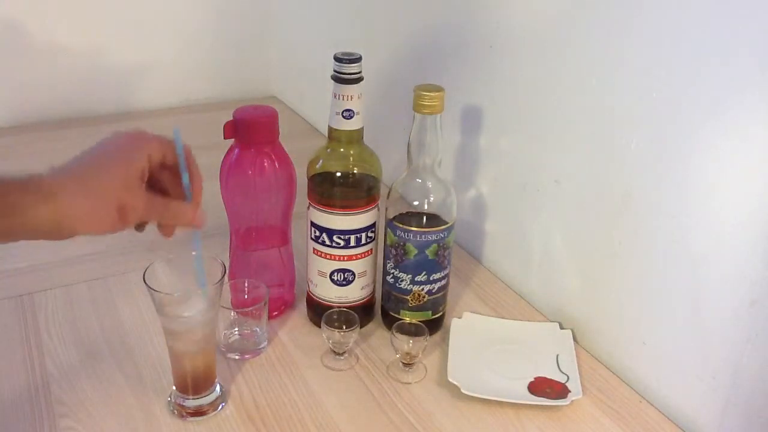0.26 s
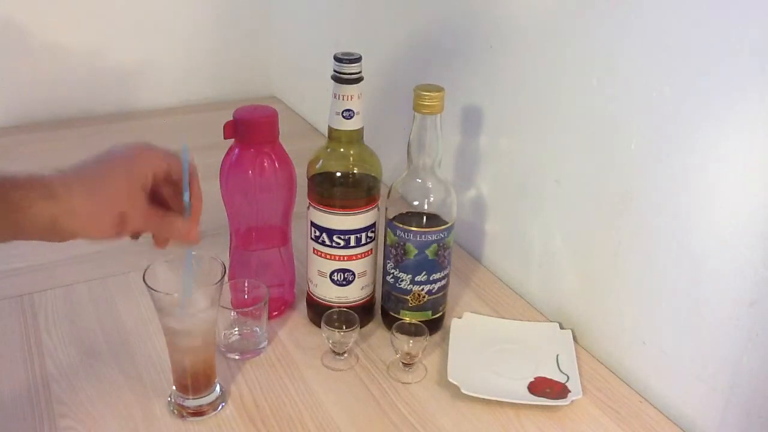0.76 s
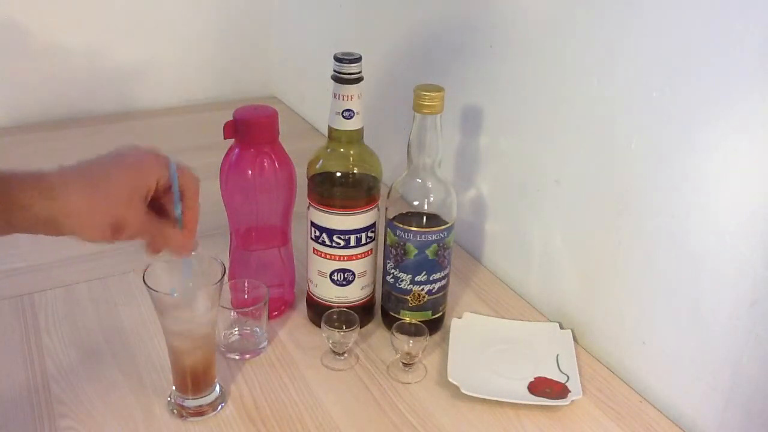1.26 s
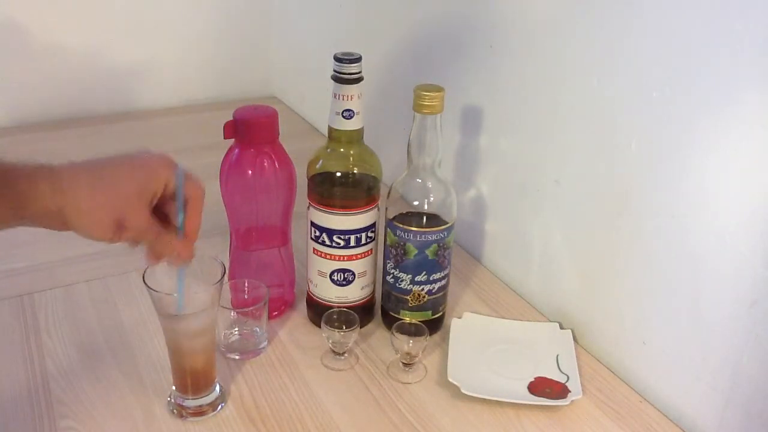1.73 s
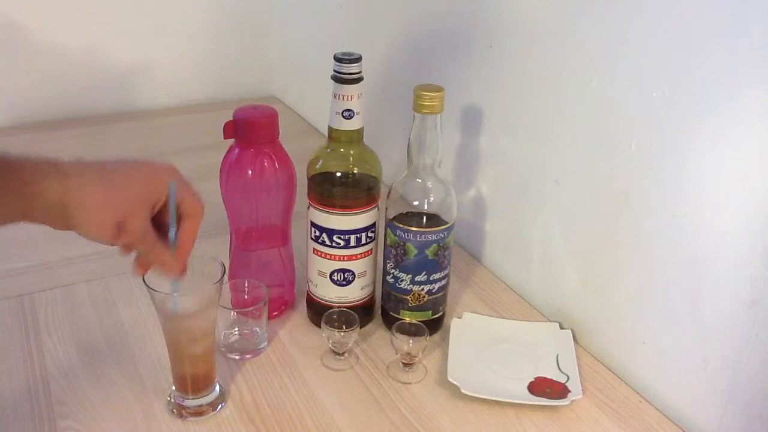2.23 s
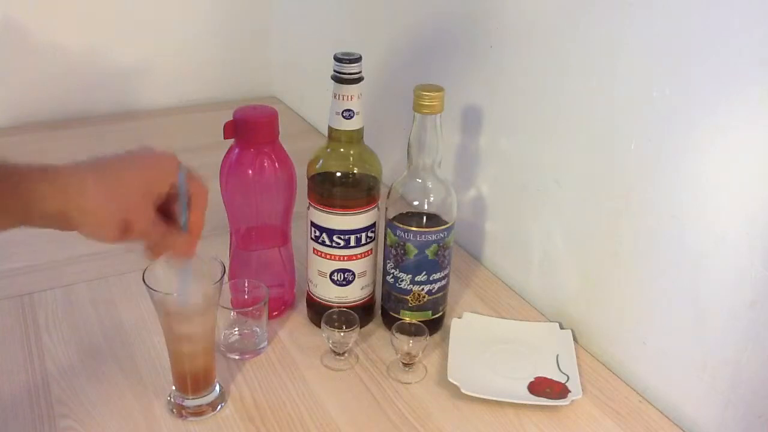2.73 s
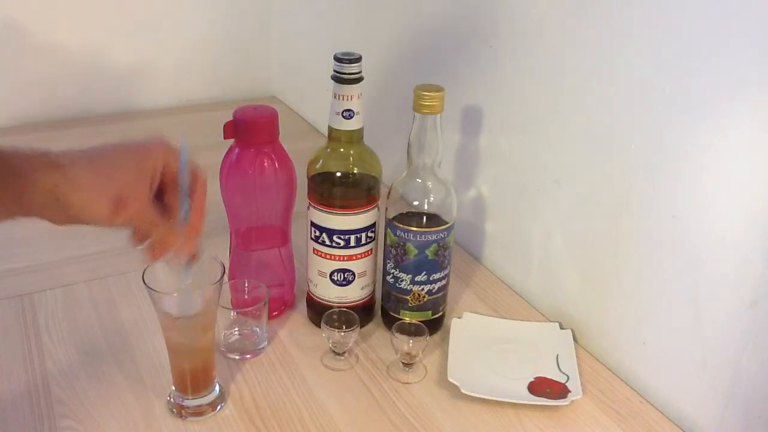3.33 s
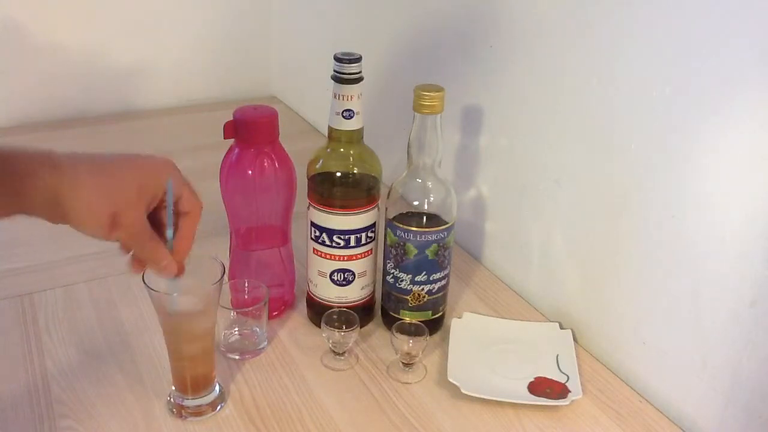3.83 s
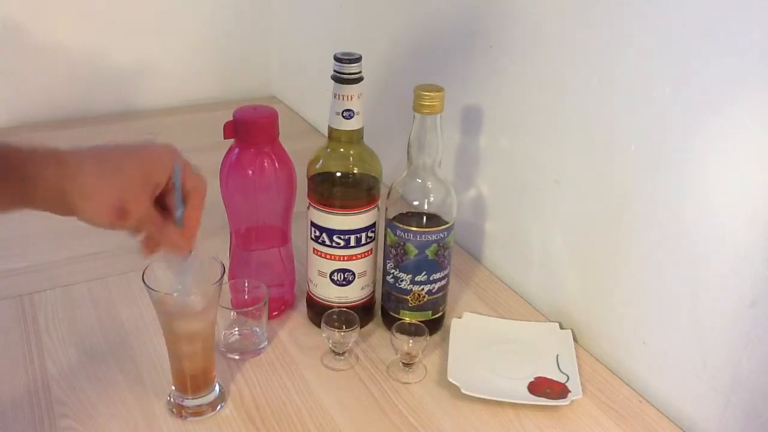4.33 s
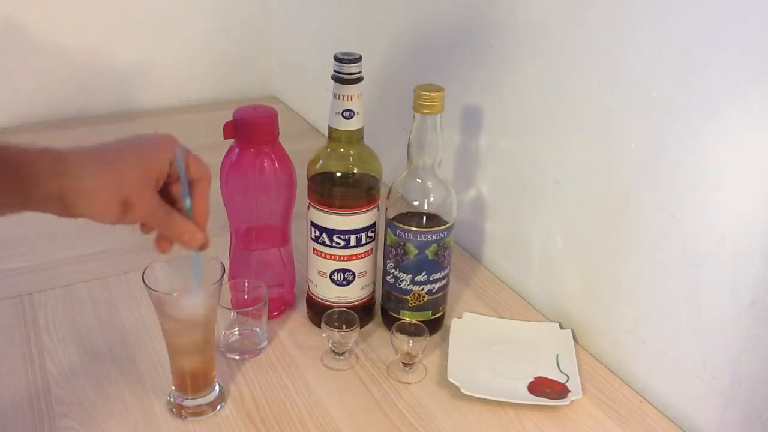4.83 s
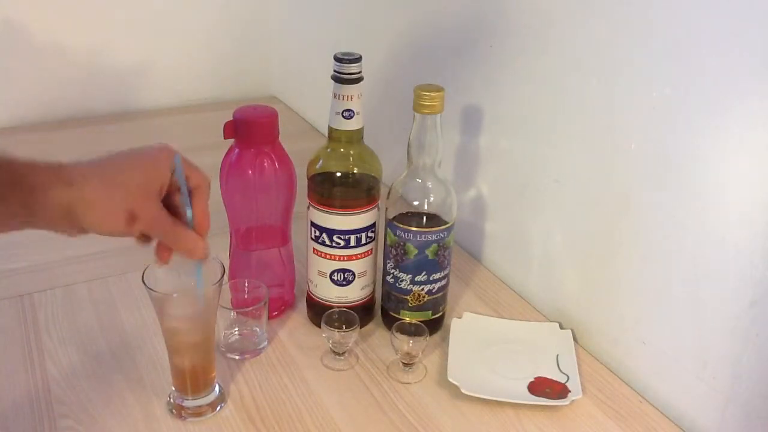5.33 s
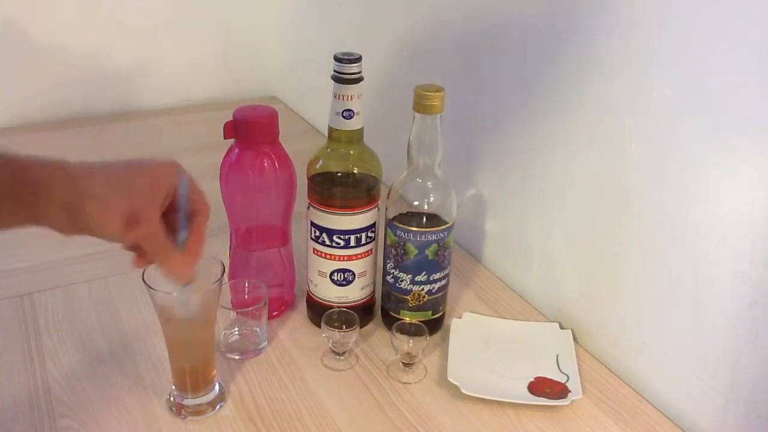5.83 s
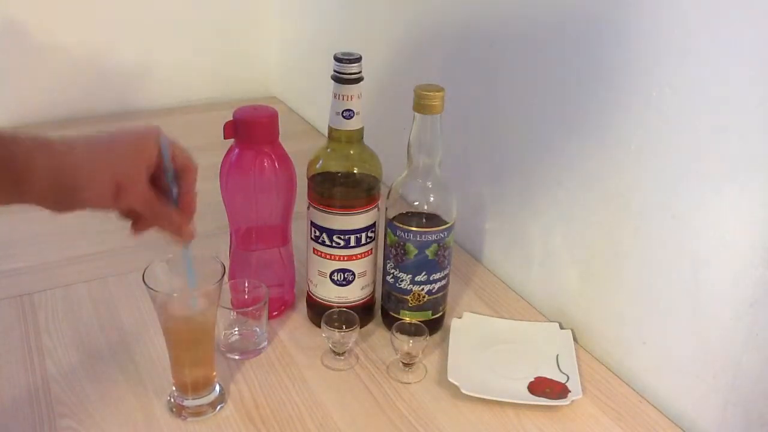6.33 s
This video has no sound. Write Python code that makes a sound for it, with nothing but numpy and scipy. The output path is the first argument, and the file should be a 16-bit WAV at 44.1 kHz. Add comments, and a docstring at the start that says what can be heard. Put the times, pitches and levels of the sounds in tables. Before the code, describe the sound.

A straw stirs an iced drink, the cubes knocking, scraping and briefly ringing the glass over soft liquid churning.

```python
"""Ice cubes, stirred with a straw, knock round a tall glass on a wooden table in a small bare room.
Each knock rings the glass wall, whose pitch shifts as the drink sloshes. Between knocks the cubes
chatter, grind and ping against each other. The straw churns the drink, traps air that rings as
bubbles and now and then jolts the glass on the table. Faint room noise and mains hum lie beneath."""
import sys
import numpy as np
from scipy import signal
from scipy.fft import rfft, irfft, next_fast_len
from scipy.io import wavfile

SR = 44100
rng = np.random.default_rng(int(sys.argv[2]) if len(sys.argv) > 2 else 0)


def master_out(mix):
    """Clip the mix to full scale and print it as 16-bit PCM to the path in sys.argv[1]."""
    frames = np.transpose(np.atleast_2d(mix))
    ceiling = np.clip(frames, -1, 1)
    pcm = np.round(ceiling * 32767).astype(np.int16)
    wavfile.write(sys.argv[1], SR, pcm)


N = 289296
AGE_S = np.arange(SR * 2 // 5) / SR  # time since a contact

# Clear knocks of ice on glass. Each row: start in seconds, nominal swell and hold in seconds,
# then low mode, second mode, upper mode and ice levels in dB, before each part's offset.
ICE_KNOCKS = [(0.001, 0.00057, .021, -30.5, -35, -47, -51), (0.051, .0006, 0.031, -39.5, -42, -63, -57),
              (0.075, 0.0008, 0.011, -37.5, -30, -39.5, -48.5), (0.118, .0005, 0.01, -49, -43, -63, -56),
              (0.259, .0004, 0.0097, -58, -44, -61, -67), (0.2816, 0.00065, 0.014, -35, -46, -48.5, -52),
              (0.3343, .0006, 0.014, -38.5, -42, -65, -70), (0.527, 0.0022, 0.0092, -38, -35, -48, -48),
              (0.5966, 0.0038, 0.0097, -40, -37, -57, -58), (0.6155, .0005, 0.0039, -32, -37, -59, -60),
              (0.6487, .0005, 0.022, -41, -40, -55, -52), (0.67, .0006, 0.0085, -36.5, -31.5, -39, -46),
              (0.7475, 0.00049, 0.0072, -45, -28.5, -42, -48.5),
              (0.784, .0004, 0.011, -35.5, -35, -55, -54), (0.8735, .0003, 0.0084, -26.5, -26.5, -33, -40),
              (1.007, 0.00035, 0.011, -30.5, -43, -63, -44.5),
              (1.068, 0.0027, 0.0094, -58, -34.5, -69, -63), (1.115, .0004, .009, -48, -41.5, -52, -64),
              (1.164, .0008, 0.011, -41.5, -57, -69, -61), (1.288, .0005, 0.031, -38, -42, -63, -52),
              (1.396, .0005, 0.014, -36, -41, -68, -63), (1.4372, .002, .012, -51, -44, -69, -69),
              (1.5273, 0.00088, 0.014, -40.5, -37, -49, -53), (1.57, 0.00036, .008, -46, -37.5, -65, -57),
              (1.643, .0005, .01, -53, -36.5, -55, -62), (1.7764, .0004, 0.03, -39, -38, -69, -44),
              (1.8302, 0.00056, 0.0077, -32.5, -38, -40, -44), (2.02, .001, 0.011, -44, -33.5, -49, -50),
              (2.039, 0.0027, 0.011, -30.5, -28.5, -37, -42.5),
              (2.073, 0.016, 0.0035, -25.5, -29, -57, -54), (2.101, 0.00097, 0.0075, -19, -17, -30, -41),
              (2.264, 0.00045, 0.017, -37, -31.5, -51, -46),
              (2.2874, 0.00055, 0.019, -35, -32.5, -63, -45.5), (2.4136, 0.0041, 0.01, -38, -47, -64, -60),
              (2.513, 0.00045, .02, -39.5, -41, -48, -47.5), (2.574, .0005, 0.0074, -29, -37.5, -57, -51),
              (2.6311, .0004, 0.016, -47, -38, -63, -56), (2.7575, 0.0004, 0.014, -42, -27.5, -45, -43),
              (2.823, .0013, 0.0049, -39, -28, -46, -57), (2.8323, 0.0053, 0.0056, -29, -21.5, -30.5, -42),
              (2.864, .0006, 0.0067, -31, -45, -54, -61), (2.93, 0.00058, 0.0075, -49, -30, -34.5, -42.5),
              (3.04, 0.00077, 0.008, -37, -29.5, -58, -51), (3.1599, .0012, 0.011, -35.5, -39, -65, -63),
              (3.1932, .008, 0.0081, -26, -25.5, -43, -38),
              (3.2276, 0.0044, 0.013, -17.5, -17.5, -26, -37.5),
              (3.277, 0.00076, 0.0055, -39, -22.5, -46, -59), (3.301, 0.0012, 0.0083, -38, -23.5, -43, -47),
              (3.3446, .0005, 0.011, -39, -43, -43, -43), (3.4476, 0.004, 0.022, -35, -25, -43.5, -43.5),
              (3.667, 0.015, .02, -33, -25.5, -44.5, -41), (3.766, 0.00038, 0.016, -43, -27, -50, -59),
              (3.8154, 0.0044, .02, -38, -31, -43.5, -43), (3.91, 0.00054, 0.032, -35.5, -34.5, -60, -48.5),
              (3.9896, 0.00061, 0.016, -37, -26, -43, -48), (4.107, 0.0012, 0.027, -54, -42, -51, -40.5),
              (4.136, 0.012, 0.011, -28, -24.5, -55, -42), (4.2324, 0.00063, 0.035, -46, -37.5, -56, -48.5),
              (4.3605, .0005, 0.01, -36.5, -25.5, -40, -43), (4.412, .0005, 0.0098, -36.5, -34, -58, -68),
              (4.4527, 0.00037, .014, -46, -27, -39.5, -49), (4.564, .022, 0.012, -37.5, -33.5, -45, -44),
              (4.613, .0003, 0.01, -29.5, -20.5, -28.5, -38), (4.689, 0.009, 0.044, -47, -49, -50, -47),
              (4.826, 0.00028, 0.0073, -30, -17.5, -28, -36.5),
              (4.8856, 0.00022, 0.014, -31, -18.5, -29, -38.5),
              (4.953, 0.0081, 0.012, -43, -32.5, -44, -44.5), (5.014, .004, 0.01, -33, -34.5, -50, -45),
              (5.034, .016, 0.04, -36.5, -61, -64, -67), (5.314, 0.00034, 0.015, -38.5, -40, -70, -73),
              (5.467, 0.00071, 0.013, -33.5, -31.5, -33, -40), (5.524, 0.0023, .016, -38, -38.5, -57, -50),
              (5.602, .0005, 0.0065, -35, -31.5, -55, -57), (5.6897, 0.018, 0.07, -55, -50, -59, -40.5),
              (5.745, 0.0063, 0.0091, -57, -25.5, -39, -45),
              (5.816, 0.00032, 0.0047, -33.5, -36, -41, -51.5),
              (5.9202, .0008, 0.015, -34, -33.5, -53, -47.5), (5.931, 0.00072, 0.0059, -26, -46, -46, -40),
              (5.975, 0.0038, 0.017, -39, -21.5, -38, -44), (6.038, 0.0057, 0.0087, -32, -25, -51, -40),
              (6.056, 0.0024, 0.021, -33, -22.5, -33.5, -36),
              (6.077, 0.00035, 0.0042, -27, -18, -38, -35.5),
              (6.3271, 0.00042, 0.0069, -35.5, -36.5, -70, -60), (6.471, 0.0017, 0.024, -41, -66, -75, -73)]
# Wall pitch as the drink leans. Each row: time in seconds, low mode in Hz.
WALL_DRIFT = [(0.0, 2464), (0.05, 2422), (0.84, 2420), (0.88, 2525), (1.02, 2410), (1.77, 2418),
              (1.81, 2530), (2.21, 2408), (3.12, 2360), (3.25, 2472), (3.4, 2424), (4.07, 2367),
              (4.11, 2485), (4.22, 2384), (6.03, 2435), (6.06, 2550), (6.38, 2428), (6.56, 2437)]
# Upper wall modes under a knock. Each row: frequency in Hz, relative level in dB.
UPPER_MODES = [(6700, -3.5), (9840, -19.5), (13700, -24)]
# Wall modes under light chatter. Each row: frequency in Hz, t60 in seconds, relative level in dB.
CHATTER_MODES = [(2421.5, 0.045, 7.5), (4313, 0.079, 3.5), (5390, 0.047, -9.5), (6770, 0.035, -8)]
# Straw sweeps. Each row: peak time in seconds, half length in seconds, push in dB,
# grinding in dB relative to the push.
SWEEPS = [(0.039, 0.14, -45, -7.5), (0.309, 0.055, -48, -7.5), (0.624, 0.049, -46, -2),
          (0.775, 0.07, -41, -6), (0.996, 0.051, -43.5, -2.5), (1.316, 0.058, -44.5, -10),
          (1.584, 0.086, -49.5, -5), (1.811, 0.052, -41.5, -11), (2.045, 0.1, -41.5, -8.5),
          (2.273, 0.066, -40.5, -8), (2.541, 0.055, -45.5, -2), (2.747, 0.054, -42, -6),
          (2.959, 0.047, -41.5, -3.5), (3.228, 0.044, -37, -4), (3.428, .07, -37, -10),
          (3.709, 0.06, -38.5, -8), (3.903, .04, -44.5, -3), (4.153, 0.053, -40.5, -6.5),
          (4.378, 0.074, -42.5, -2.5), (4.651, .04, -44.5, -8), (4.874, 0.071, -37.5, -9),
          (4.997, 0.064, -45, -10), (5.284, .05, -51, -16), (5.549, .06, -40.5, -11),
          (5.728, 0.045, -38.5, -5), (5.989, 0.042, -30.5, -4.5), (6.098, 0.063, -34, -5.5),
          (6.327, .07, -49, -8), (6.531, .06, -46.5, -16)]
# Air pulled under by the straw. Each row: start in seconds, relative level in dB, pitch in Hz.
GULPS = [(0.077, -39.5, 1460), (1.5755, -41, 1650), (1.655, -43, 1800), (3.6184, -34.5, 1730),
         (3.6446, -28, 1720), (3.9015, -42, 1590), (4.135, -36.5, 1616), (4.8386, -33.5, 1400),
         (4.8471, -24.5, 1660), (5.04, -40, 1930), (5.672, -43, 1960), (5.9763, -31.5, 1610),
         (6.0166, -28, 1640), (6.0395, -23, 1566), (6.0785, -22, 1785), (6.131, -19.5, 1723),
         (6.2398, -30, 1710), (6.3, -40, 1790)]
# Cube against cube. Each row: start in seconds, relative level in dB.
CUBE_HITS = [(0.5063, -39), (0.6723, -27.5), (0.769, -32), (0.851, -34), (0.909, -24.5), (0.96, -36),
             (2.032, -29), (2.08, -35), (2.2647, -38), (2.448, -33), (3.2044, -22.5), (3.4357, -31),
             (3.588, -30.5), (3.603, -30.5), (3.656, -32), (4.108, -25), (4.141, -32), (4.798, -31.5),
             (5.465, -30.5), (5.6922, -29), (6.009, -24), (6.104, -27.5)]
# Jolts of the glass on the table. Each row: start in seconds, relative level in dB.
JOLTS = [(0.612, -27), (0.67, -42), (2.775, -30.5), (2.929, -26.5), (3.231, -28.5), (3.435, -33.5),
         (4.145, -25.5), (5.725, -30), (5.755, -26.5), (6.077, -28)]
# Mains hum. Each row: frequency in Hz, rms level in dB.
MAINS_HUM = [(48.4, -84)]
# Room decay. Each row: frequency in Hz, t60 in seconds.
ROOM_T60 = [(200, 0.4), (2000, 0.3), (5000, 0.43), (10000, 0.31), (16000, 0.14)]
# Noise spectra. Each row: frequency in Hz, relative density in dB.
CRACK_SPECTRUM = [(150, -82), (400, -3), (1000, -20), (1700, -6.5), (3000, -1.5), (3700, -0.5), (4900, -1),
                  (5550, -2.5), (6300, -2), (8000, -8), (12000, -15), (15500, -23.5)]  # ice chipping
GRIND_SPECTRUM = [(300, -22.5), (900, 0), (1600, -5.5), (3000, 5), (3700, 4.5), (4900, 2.5), (5550, 12.5),
                  (6300, -13), (8000, -5.5), (12000, -7), (15500, -25)]  # ice rubbing
CHURN_SPECTRUM = [(75, -46.5), (125, -8), (250, -7), (350, 1.5), (400, -4), (500, -4), (600, -11),
                  (850, -15), (1150, -18), (2000, -39)]  # drink gurgling
FLOOR_SPECTRUM = [(18, -56), (30, -37), (77, -21), (105, -16), (135, -4), (240, -3.5), (370, -1.5),
                  (520, -5), (852, -8.5), (2070, -20.5), (2420, -3), (2830, -11), (3880, -20), (4310, -32),
                  (4660, -31), (5450, -16), (6210, -24), (6720, -18), (15500, -21)]  # room noise
SPLASH_SPECTRUM = [(250, -19), (650, -8), (1000, -2.5), (1500, -2.5), (2100, 7), (3000, -3), (8000, -42)]  # drink closing over a gulp
THUD_SPECTRUM = [(70, -58), (150, -48), (270, -5), (345, -3), (400, 7), (470, -2), (530, -4), (620, -8.5),
                 (900, -12), (1300, -29), (2500, -51)]  # glass foot on the table top


def amp(db):
    """Decibels to gain."""
    return 10 ** (np.asarray(db) / 20)


def unit(x):
    """Scale to rms 1."""
    return x / np.sqrt(np.mean(x ** 2) + 1e-20)


def along(points, hz):
    """Interpolate (Hz, value) points on a log axis."""
    points_hz, values = np.transpose(points)
    return np.interp(np.log(hz + 1), np.log(points_hz), values)


def add(track, start_s, sound):
    """Mix a sound into a track."""
    part = track[max(round(start_s * SR), 0):][:len(sound)]
    part += sound[:len(part)]


def coloured(x, spectrum):
    """Minimum-phase filter: clicks keep their sharp start."""
    size = next_fast_len(len(x) + 2048, True)
    gain = amp(along(spectrum, np.fft.rfftfreq(size, 1 / SR)))
    cepstrum = irfft(np.log(gain), size)
    cepstrum[1:size // 2] *= 2
    cepstrum[size // 2 + 1:] = 0
    return irfft(rfft(x, size) * np.exp(rfft(cepstrum)), size)[:len(x)]


def contacts(per_s, spread_db):
    """Random impulses of uneven size; rms 1."""
    hit = rng.random(N) < per_s / SR
    return unit(hit * rng.choice([-1, 1], N) * amp(spread_db * rng.uniform(-2.03, 2.0, N)))


def room_tails(count):
    """Diffuse room responses of energy 1; the top treble dies first."""
    hz, time_s, noise = signal.stft(rng.standard_normal((count, len(AGE_S))), SR, nperseg=256)
    decay = amp(-60 * time_s / along(ROOM_T60, hz)[:, None])
    tails = signal.istft(noise * decay, SR, nperseg=256)[1][:, :len(AGE_S)]
    onset = np.clip((AGE_S - 0.003) / 0.0053, 0, 1)
    corner_boost = 1 + 3.6 * np.exp(-AGE_S / 0.015)  # the corner answers early
    tails = tails * onset * corner_boost
    return tails / np.linalg.norm(tails, axis=1, keepdims=True)


def in_room(x, tails, wet_db):
    """A sound plus one room response, wet_db relative to its rms."""
    wet = signal.fftconvolve(x, tails[rng.integers(len(tails))])[:len(x)]
    return x + amp(wet_db) * np.sqrt(np.mean(x ** 2)) * unit(wet)


def choked_mode(hz, swell_s, hold_s):
    """A wall mode builds during contact; the settling cube chokes it, 6 dB down after hold_s."""
    rise = np.minimum(AGE_S / max(swell_s, 1e-4), 1)
    fall_db = -6 * (np.maximum(AGE_S - swell_s, 0) / hold_s) ** 2.54
    return rise * amp(np.maximum(fall_db, -200)) * np.sin(2 * np.pi * hz * AGE_S)


def free_mode(hz, t60_s, swell_s):
    """A mode builds during contact, then decays freely."""
    rise = np.minimum(AGE_S / max(swell_s, 1e-4), 1)
    fall_db = -60 * np.maximum(AGE_S - swell_s, 0) / t60_s
    return rise * amp(fall_db) * np.sin(2 * np.pi * hz * AGE_S)


def cube_ping():
    """An uneven lump of ice rings in four close, short-lived modes; rms 1."""
    return unit(sum(free_mode(rng.normal(5600, 174), t60_s=0.075, swell_s=0.00074) * rng.choice([-1, 1])
                    for _ in range(4)))


def crack(swell_s, hold_s):
    """A cube chips, then skids, longer with a longer hold: a clump of micro-ticks; rms 1."""
    age_s = AGE_S[:len(AGE_S) // 4]
    rise = np.minimum(age_s / (0.1 * swell_s + 0.00044), 1)
    chip_t60_s, skid_t60_s = 0.0094, 0.023 + 2.5 * hold_s
    fall = amp(-60 * age_s / chip_t60_s) + 0.83 * amp(-60 * age_s / skid_t60_s)
    tick_db = 4.4 * np.repeat(rng.uniform(-0.7, 1, len(age_s)), SR // 1000)[:len(age_s)]  # 1 ms steps
    spectrum = [(hz, db + rng.normal(0, 2.94)) for hz, db in CRACK_SPECTRUM]
    ticks = amp(tick_db) * rng.standard_normal(len(age_s)) * rise * fall
    return unit(np.pad(coloured(ticks, spectrum), (0, len(AGE_S) - len(age_s))))


def light_knocks(per_sweep, swell_s=0.00072, hold_s=0.0083, spread_db=3, edge_fade_db=8.5):
    """Knocks scattered through each sweep, weaker at its edges; rows as in ICE_KNOCKS."""
    rows = []
    balance_db = np.array([-1, 2, -11.5, -12.5])  # low, second, upper, ice
    for peak_s, half_s, push_db, _ in SWEEPS:
        for k in range(per_sweep):
            position = 2 * (k + rng.random()) / per_sweep - 1  # -1 to 1
            levels_db = push_db + balance_db + rng.normal(0, spread_db, 4) - edge_fade_db * position ** 2
            rows.append((peak_s + 1.3 * half_s * position, swell_s, hold_s, *levels_db))
    return rows


def clinks(tails, slosh_scatter_hz=7.4):
    """Ice strikes glass: the wall modes ring, the cube pings and cracks."""
    out = np.zeros(N)
    drift_s, drift_hz = np.transpose(WALL_DRIFT)
    knocks = ICE_KNOCKS + light_knocks(per_sweep=3)
    for start_s, swell_s, hold_s, low_db, second_db, upper_db, ice_db in knocks:
        low_hz = np.interp(start_s, drift_s, drift_hz) + rng.normal(0, slosh_scatter_hz)
        second_hz = 4255 + 0.31 * (low_hz - drift_hz.mean()) + rng.normal(0, slosh_scatter_hz)
        low = amp(low_db) * choked_mode(low_hz, swell_s + 0.0011, hold_s * 0.88)
        second = amp(second_db + 1) * choked_mode(second_hz, swell_s + 0.0006, hold_s * 0.98)
        upper = sum(amp(upper_db + rng.normal(db, 2.2)) * choked_mode(rng.normal(hz, 42), swell_s, hold_s)
                    for hz, db in UPPER_MODES)
        ice = amp(ice_db - 27 + rng.normal(0, 2.7)) * cube_ping()
        ice += amp(ice_db - 12.5) * crack(swell_s, hold_s)
        for part, wet_db in (low, -4.5), (second, -9), (upper, 1.5), (ice, -0.5):
            add(out, start_s, in_room(part, tails, wet_db))
    return out


def sweep_gain(grind=False):
    """Envelope of the straw's push, or of the grinding: each sweep builds up and coasts out."""
    time_s = np.arange(N) / SR
    power = np.zeros(N)
    for peak_s, half_s, push_db, grind_db in SWEEPS:
        width_s = half_s * np.where(time_s < peak_s, 0.95, 1.17)
        bell = np.exp(-np.minimum(((time_s - peak_s) / width_s) ** 2, 20))
        power += amp(push_db + grind_db if grind else push_db) ** 2 * bell
    idle_db = -61 if grind else -60
    return np.sqrt(power + amp(idle_db) ** 2)


def chatter(tails):
    """Countless light touches keep the wall ringing while the cubes circle."""
    wall = sum(amp(db) * free_mode(hz, t60_s, swell_s=0.00093) for hz, t60_s, db in CHATTER_MODES)
    ringing = unit(signal.fftconvolve(contacts(per_s=220, spread_db=4), wall)[:N])
    return in_room(amp(-8) * sweep_gain() * ringing, tails, wet_db=4.5)


def grinding(tails):
    """Cubes rub each other and the straw: dense dry ticks."""
    ticks = unit(coloured(contacts(per_s=240, spread_db=9), GRIND_SPECTRUM))
    return in_room(amp(-7.5) * sweep_gain(grind=True) * ticks, tails, wet_db=2.5)


def flow_gain(db_per_push_db, usual_push_db=-41.5):
    """The drink follows the push, but more evenly; gain 1 at the usual push."""
    return (sweep_gain() / amp(usual_push_db)) ** db_per_push_db


def churning(tails):
    """The stirred drink gurgles low in the glass."""
    gurgle = unit(coloured(contacts(per_s=900, spread_db=4), CHURN_SPECTRUM))
    return in_room(amp(-54) * flow_gain(db_per_push_db=0.3) * gurgle, tails, wet_db=-5.5)


def bubble(hz, cycles):
    """Trapped air rings, rising in pitch as it nears the surface."""
    t60_s = cycles / hz
    phase = 2 * np.pi * hz * (AGE_S + 0.038 * AGE_S ** 2 / t60_s)
    rise = 1 - np.exp(-AGE_S / 0.0014)
    return rise * amp(-60 * AGE_S / t60_s) * np.sin(phase)


def bubbling(tails):
    """A fine spray of bubbles swells with the flow."""
    spray = np.zeros(N)
    for when, loudness, pitch in rng.random((900, 3)):
        add(spray, when * N / SR, amp(10 * loudness) * bubble(1400 * 1.48 ** pitch, cycles=12))
    return in_room(amp(-61) * flow_gain(db_per_push_db=0.49) * unit(spray), tails, wet_db=-1.5)


def background():
    """Steady room noise with a faint mains hum."""
    hum = sum(amp(db) * unit(np.sin(2 * np.pi * hz * np.arange(N) / SR)) for hz, db in MAINS_HUM)
    return amp(-58) * unit(coloured(rng.standard_normal(N), FLOOR_SPECTRUM)) + hum


def gulps(tails, splash_t60_s=0.2, wake_delay_s=0.035, wake_scatter_oct=0.16, wake_oct_per_s=1.7):
    """Air pulled under plips, splashes and sheds a wake of bubbles, the later ones smaller and higher."""
    plips, splash_gain = np.zeros(N), np.zeros(N)
    for start_s, db, hz in GULPS:
        add(plips, start_s, amp(db + 8.5) * bubble(hz, cycles=26.6))
        add(splash_gain, start_s, amp(db - 23.5 - 60 * AGE_S / splash_t60_s))
        for delay_s, scatter in zip(rng.exponential(wake_delay_s, 8), rng.standard_normal(8)):
            wake_hz = hz * 2 ** (wake_scatter_oct * scatter + wake_oct_per_s * delay_s)
            wake_db = db - 8 - 2.2 * delay_s / wake_delay_s
            add(plips, start_s + delay_s, amp(wake_db) * bubble(wake_hz, cycles=37))
    splash = splash_gain * unit(coloured(contacts(per_s=1000, spread_db=3.5), SPLASH_SPECTRUM))
    return in_room(plips, tails, wet_db=-2.5) + in_room(splash, tails, wet_db=-1.5)


def cube_hits(tails):
    """Two cubes meet clear of the wall: a bright ping and a tick."""
    out = np.zeros(N)
    for start_s, db in CUBE_HITS:
        ping = amp(db - 27) * cube_ping()
        tick = amp(db - 30.5) * crack(swell_s=0, hold_s=0.0067)
        add(out, start_s, in_room(ping + tick, tails, wet_db=0))
    return out


def table_jolts(tails, rise_s=0.0035, t60_s=0.086):
    """The foot of the glass judders dully on the table top."""
    out = np.zeros(N)
    envelope = (1 - np.exp(-AGE_S / rise_s)) * amp(-60 * AGE_S / t60_s)
    for start_s, db in JOLTS:
        thud = unit(coloured(envelope * rng.standard_normal(len(AGE_S)), THUD_SPECTRUM))
        add(out, start_s, in_room(amp(db - 29.5) * thud, tails, wet_db=-5))
    return out


def scene():
    """The stirred glass in its room, mono."""
    tails = room_tails(count=24)
    ice = clinks(tails) + cube_hits(tails) + chatter(tails) + grinding(tails)
    drink = gulps(tails) + bubbling(tails) + churning(tails)
    return (ice + drink + table_jolts(tails) + background())[None]


def record(dry, low_cut_hz=35, top_hz=15600):
    """The microphone sheds deep bass and passes nothing above top_hz."""
    size = next_fast_len(N + SR // 2)
    hz = np.fft.rfftfreq(size, 1 / SR)
    highpass = 1 / np.sqrt(1 + (low_cut_hz / (hz + 1)) ** 8)
    return irfft(rfft(dry, size) * highpass * (hz < top_hz), size)[:, :N]


dry = scene()
out = record(dry)
master_out(out)
```